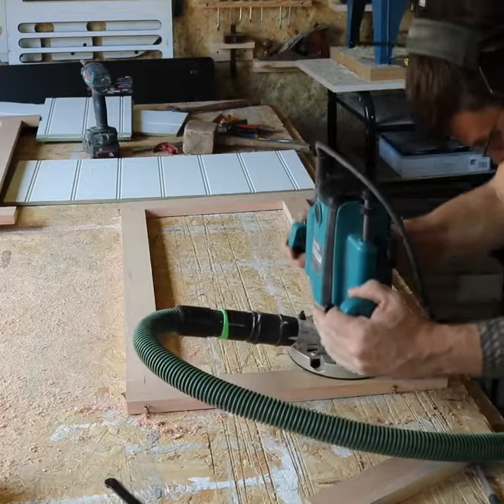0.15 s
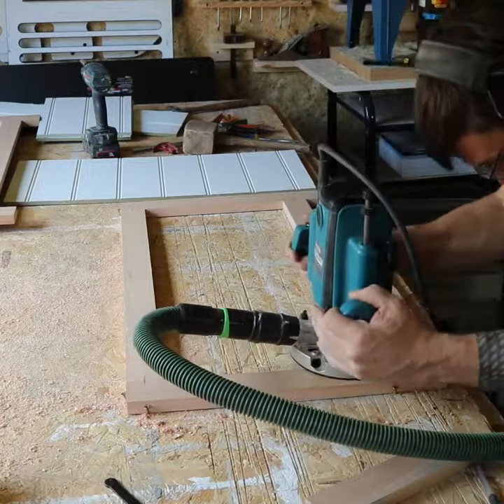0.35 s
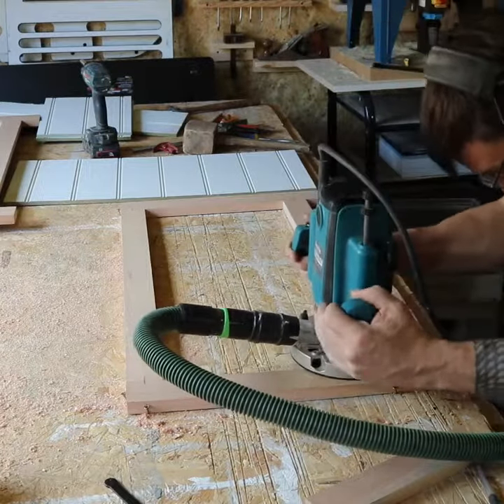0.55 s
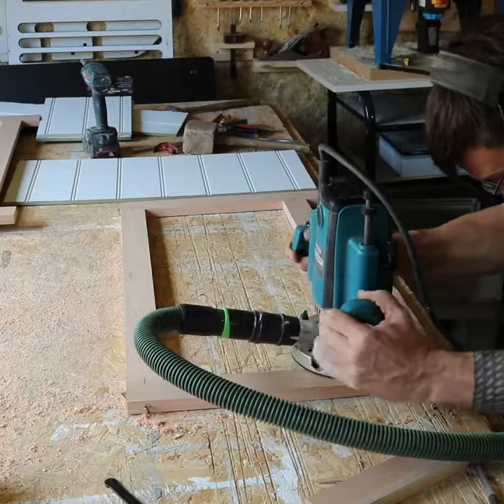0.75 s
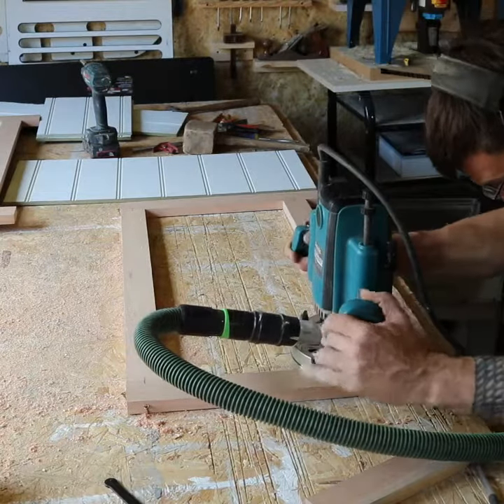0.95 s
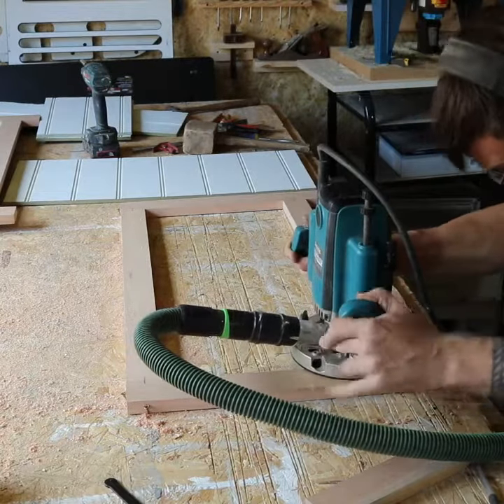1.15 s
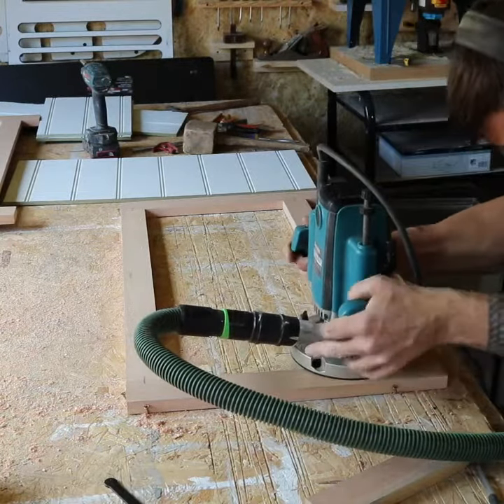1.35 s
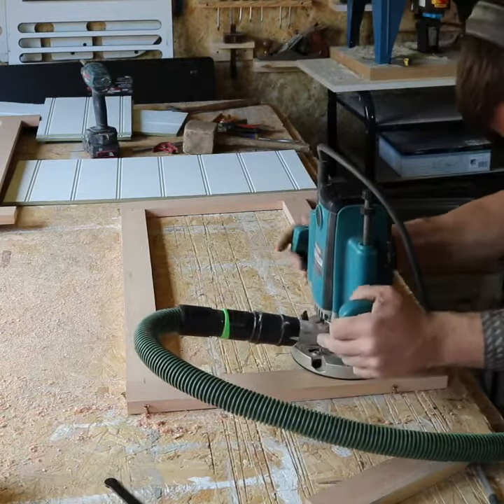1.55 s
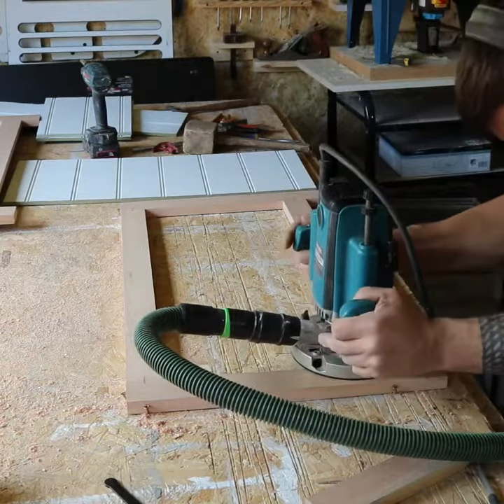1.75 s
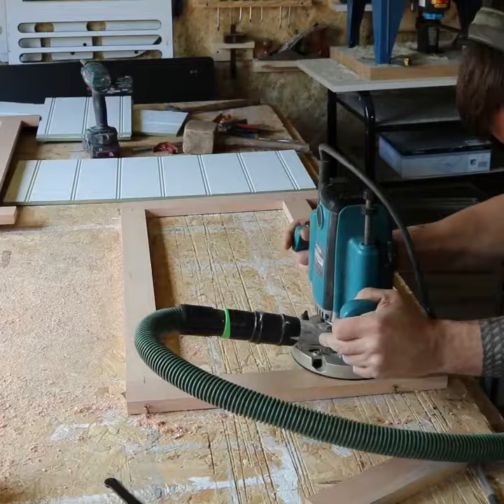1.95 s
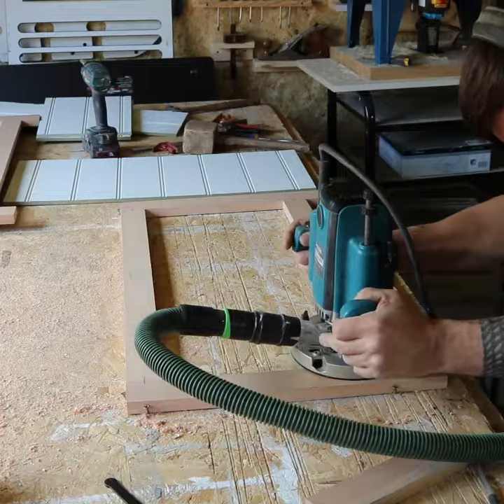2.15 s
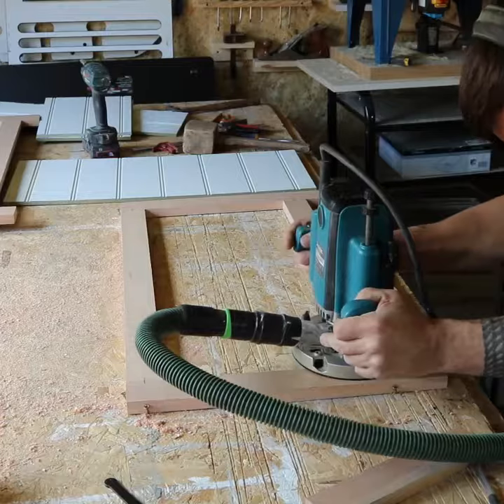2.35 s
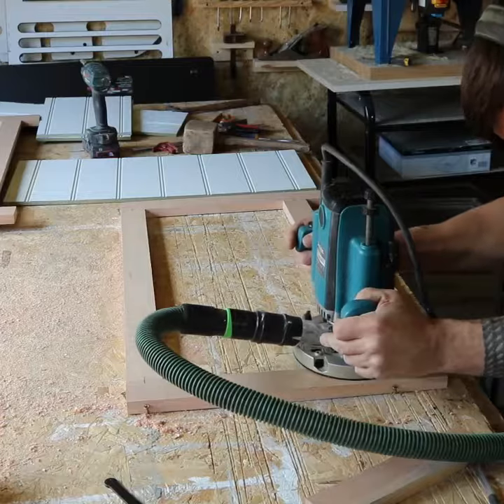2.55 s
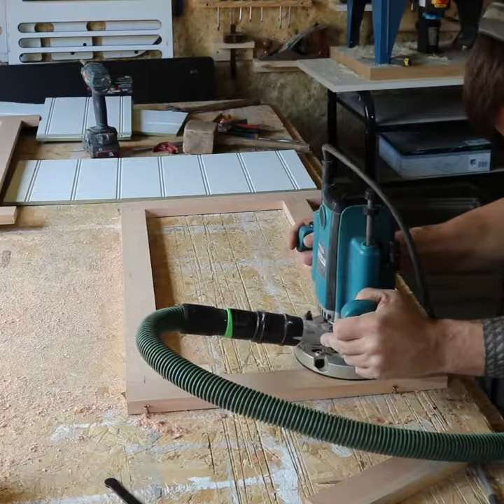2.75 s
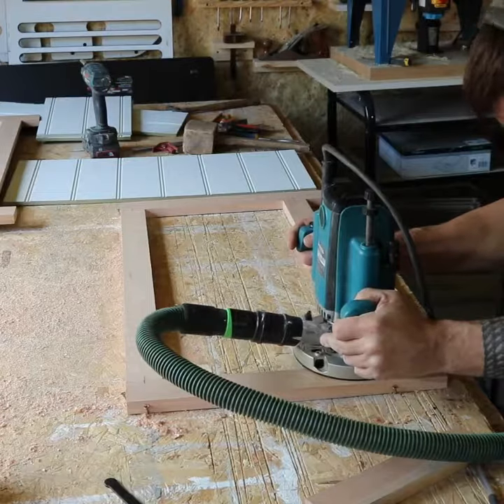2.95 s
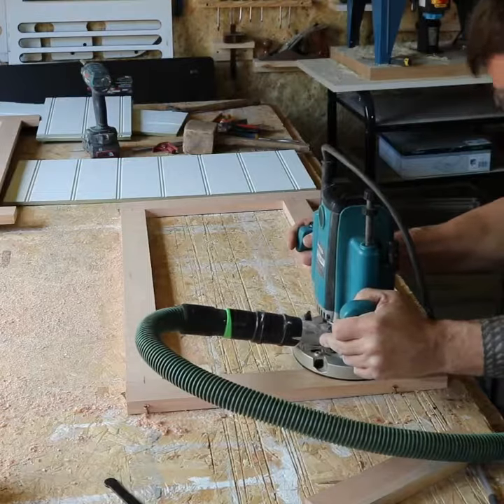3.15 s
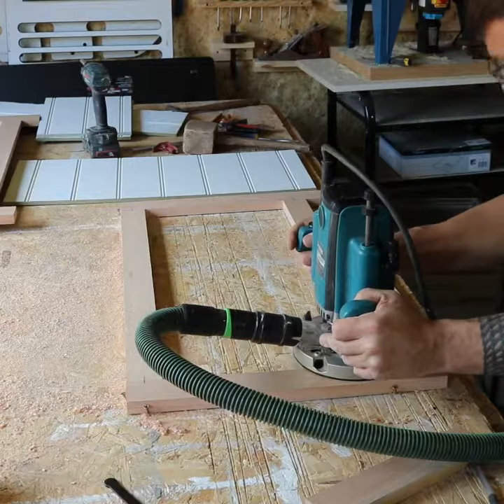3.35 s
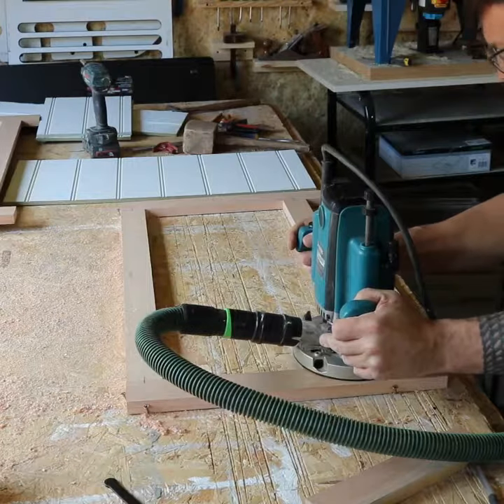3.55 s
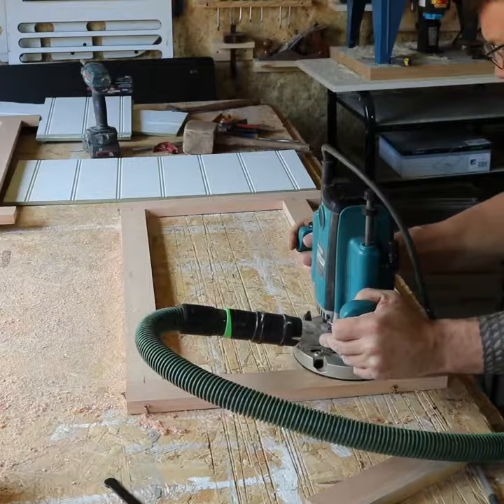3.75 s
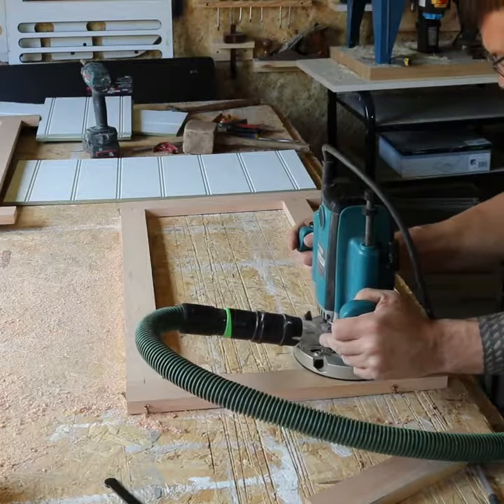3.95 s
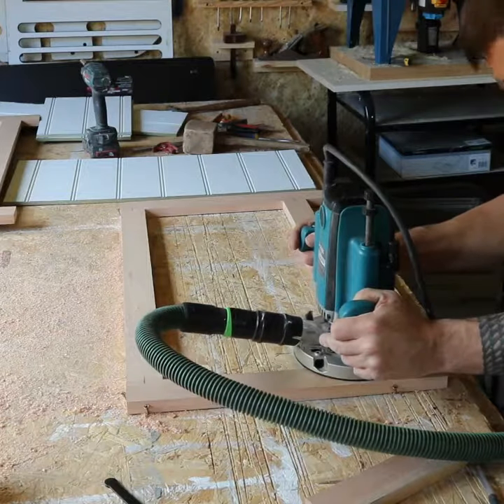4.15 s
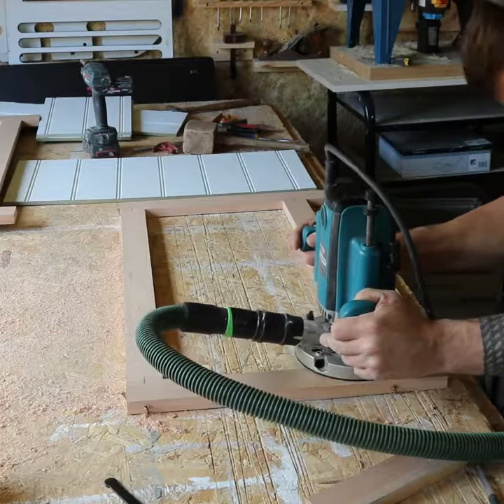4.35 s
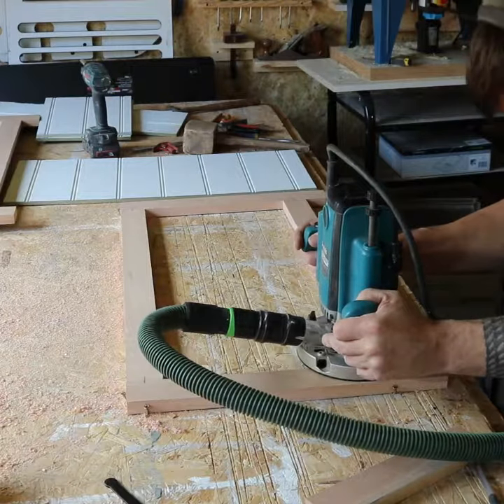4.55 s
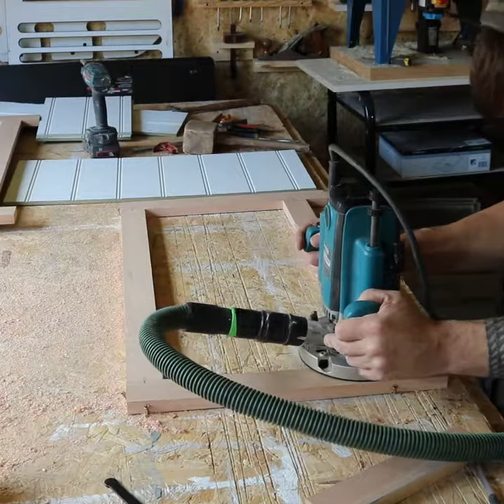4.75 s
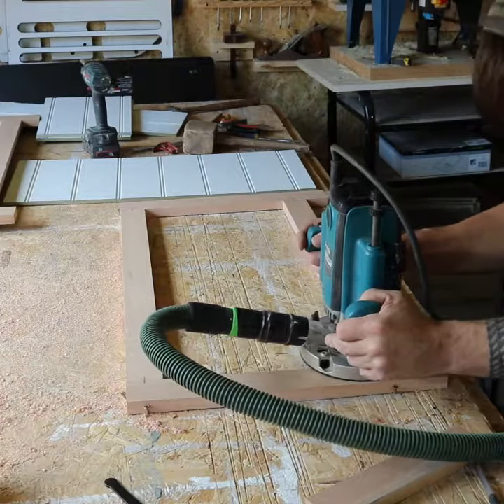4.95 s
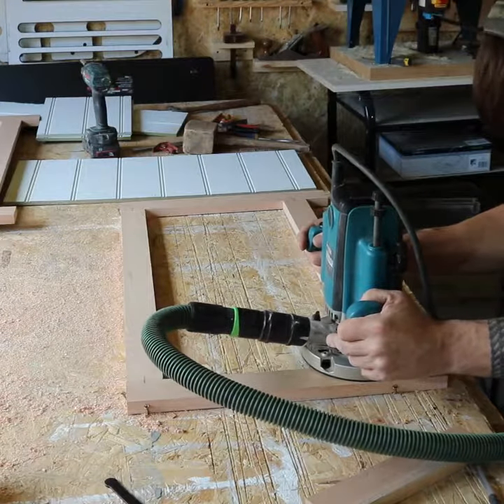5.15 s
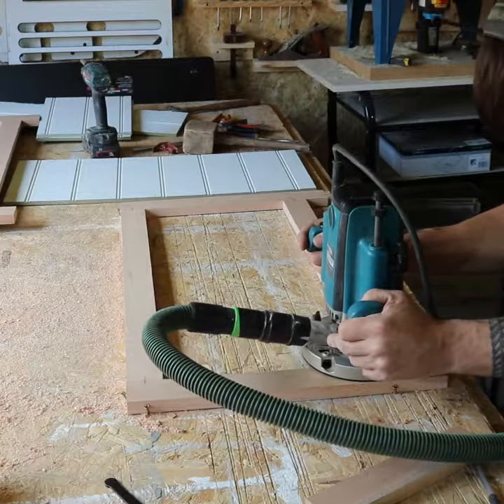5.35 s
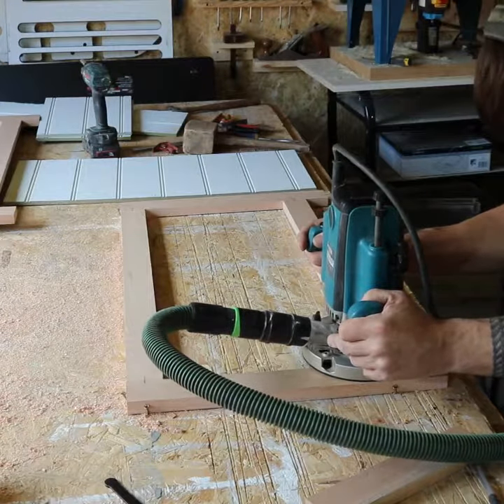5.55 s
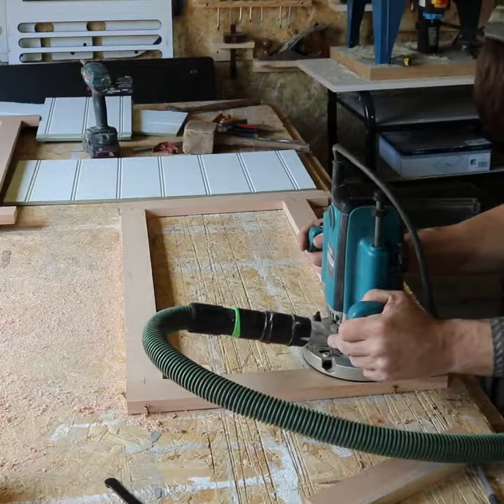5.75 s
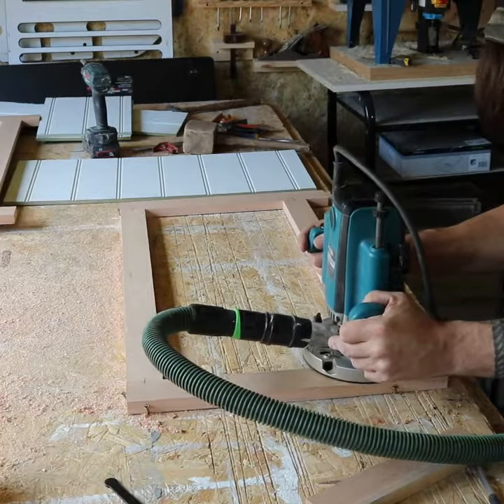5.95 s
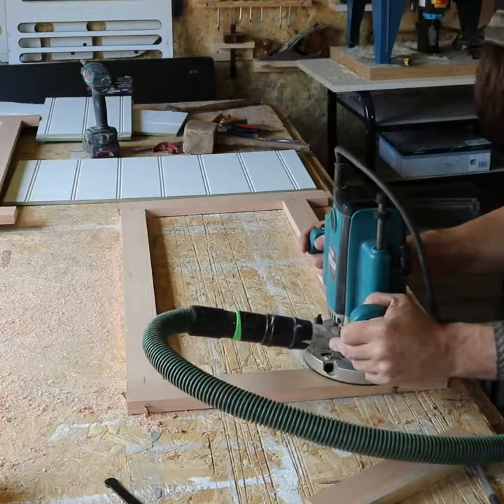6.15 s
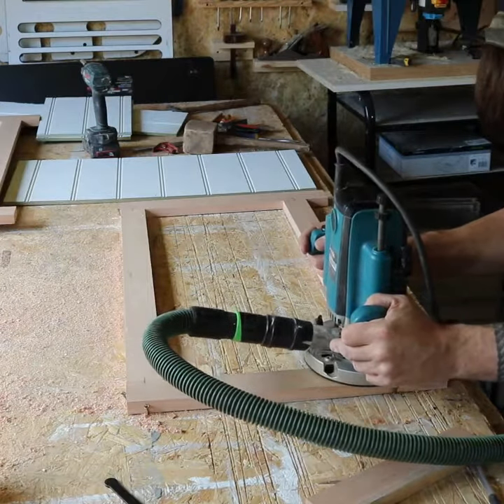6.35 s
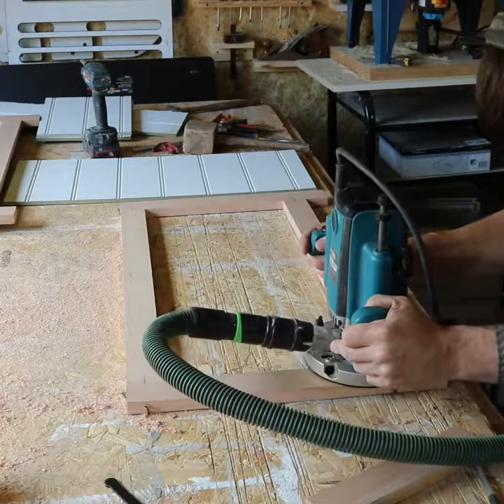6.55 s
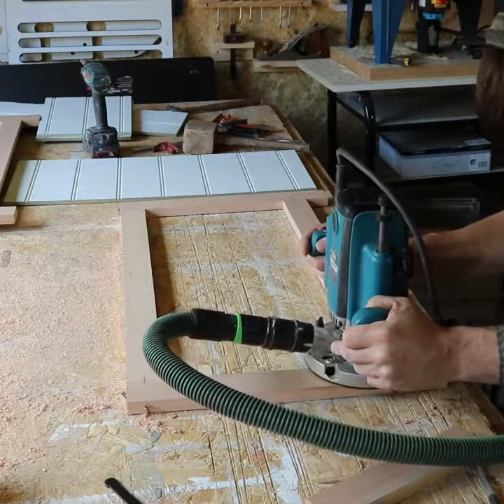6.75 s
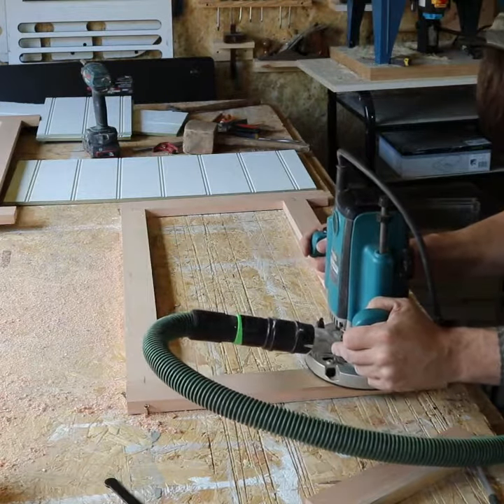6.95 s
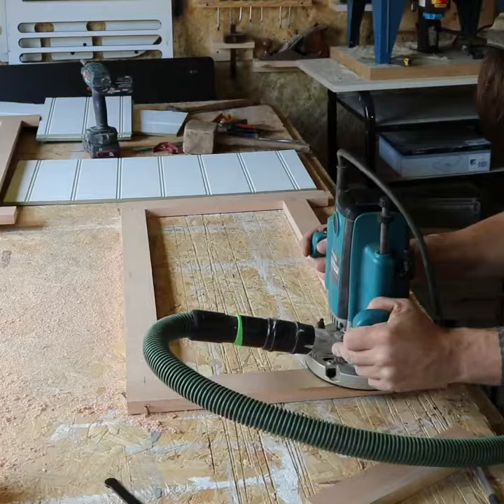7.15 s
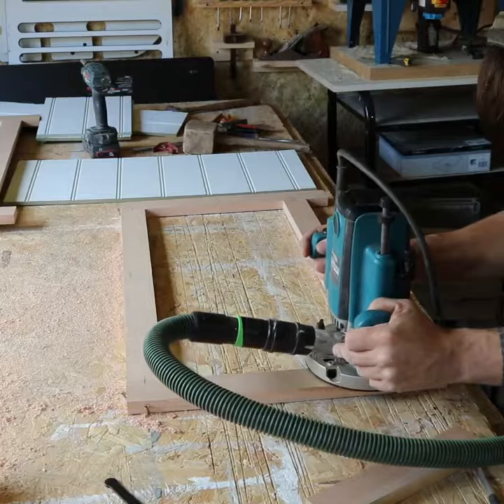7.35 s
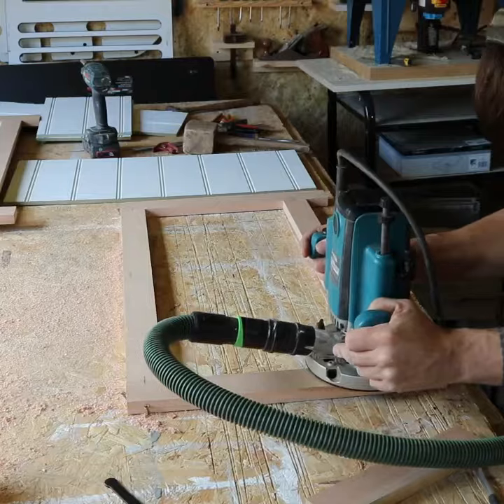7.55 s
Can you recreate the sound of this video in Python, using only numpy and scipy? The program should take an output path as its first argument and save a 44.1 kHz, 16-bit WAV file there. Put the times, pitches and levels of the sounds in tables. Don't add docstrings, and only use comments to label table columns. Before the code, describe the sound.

Rubs and knocks on a wooden bench, a sharp switch snap, then a router buzzes, spins up to a high whine and bites into wood.

```python
import sys
import numpy as np
from scipy import signal
from scipy.fft import rfft, irfft
from scipy.io import wavfile
from scipy.ndimage import uniform_filter1d

SR = 44100
rng = np.random.default_rng(int(sys.argv[2]) if len(sys.argv) > 2 else 0)


def elevation(decibels):
    levels = np.asarray(decibels, float)
    return 10 ** (levels / 20)


def waveform_to_disk(signal):
    frames = np.transpose(np.atleast_2d(signal))
    scaled = np.clip(frames, -1, 1) * 32767
    samples = np.round(scaled).astype(np.int16)
    wavfile.write(sys.argv[1], SR, samples)


N = 338688


def evened(x):
    return x / np.sqrt(np.mean(x ** 2) + 1e-20)


def read(points, hz):
    f, value = np.transpose(points)
    return np.interp(np.log(hz + 1), np.log(f + 1), value, left=-90, right=-90)


def curves(rows):
    s, *columns = np.transpose(rows)
    return [np.interp(np.arange(N) / SR, s, c) for c in columns]


def drift(rate_hz):
    t = np.arange(0, N + 256, 256) / SR
    rates = rate_hz * np.geomspace(.08, 1, 16)
    slow = sum(np.sin(2 * np.pi * (f * t + rng.random())) / np.sqrt(f) for f in rates)
    return np.interp(np.arange(N) / SR, t, evened(slow))


def bumps(rows):
    t = np.arange(0, N + 64, 64) / SR
    arches = sum(height * np.cos(np.pi / 2 * np.clip((t - s) / half, -1, 1)) ** 2 for s, half, height in rows)
    return np.interp(np.arange(N) / SR, t, arches + 0 * t)


def noise(spectrum, patchy_db, peaks=()):
    hz = np.fft.rfftfreq(1024, 1 / SR)
    a, b, patches = rng.standard_normal((N // 256 + 5, 513, 3)).T
    patches = evened(uniform_filter1d(uniform_filter1d(patches, 8, 0), 10, 1))
    db = read(spectrum, hz) + sum(d / (1 + (2 * (hz - f) / w) ** 2) for f, w, d in peaks)
    z = (a + 1j * b) * elevation(db[:, None] + patchy_db * patches)
    return evened(signal.istft(z, nperseg=1024, noverlap=768)[1][:N])


def resonate(x, hz, width):
    turn = np.exp(2j * np.pi * np.cumsum(hz * np.ones(len(x))) / SR)
    r = np.exp(-np.pi * width / SR)
    return 2 * (turn * signal.lfilter([(1 - r) ** 2], [1, -2 * r, r * r], x / turn)).real


def rings(modes, t, shorter):
    return sum(elevation(db - 60 * t / (shorter * min(t60, .3))) * np.sin(2 * np.pi * hz * t) for hz, db, t60 in modes)


def add(mix, s, sound):
    part = mix[round(s * SR):][:len(sound)]
    part += sound[:len(part)]


def shop(x):
    taps, t = np.zeros(SR // 2), np.arange(SR // 2) / SR
    at = np.arange(300, SR // 2 - 20, 20)
    taps[at + rng.integers(0, 20, len(at))] = rng.choice([-1., 1.], len(at))
    tail = signal.lfilter([.6], [1, -.4], taps * elevation(-60 * t / 0.25))
    return signal.fftconvolve(x, tail / np.linalg.norm(tail))[:N]


# f/Hz, level per Hz/dB
SHOP_AIR = [(60, -24), (100, -6), (150, 0), (220, -1), (400, -5), (800, -40)]


def hush():
    microphone = elevation(-61.5) * noise([(3000, -1), (9000, -2), (16200, -9)], .8)
    return microphone + elevation(-59.5) * noise(SHOP_AIR, 2.9)


EXTRACTOR_S, EXTRACTOR_DB = 3.05, -43
EXTRACTOR_HZ, SLACK_HZ, RUN_UP_S = 610, 200, 0.45


def extractor():
    t = np.maximum(np.arange(N) / SR - EXTRACTOR_S, 0)
    hz = EXTRACTOR_HZ - SLACK_HZ * np.exp(-t / RUN_UP_S) + 2 * drift(5)
    level = elevation(EXTRACTOR_DB - 1.5 * t + 3.5 * drift(6)) * np.minimum(t / .1, 1)
    return level * np.sqrt(2) * np.cos(2 * np.pi * np.cumsum(hz) / SR)


# f/Hz, t/s, half length/s, level/dB
HELD = [(300, 2.24, 0.13, -45), (514, 2.25, 0.19, -37), (600, 1.88, 0.15, -39), (1170, 1.96, 0.16, -36),
        (1180, 2.6, 0.05, -29), (650, 2.2, 0.06, -32), (100, 2.3, 0.45, -53), (100.1, 2.9, 0.8, -55.5),
        (1090, 2.4, 0.09, -30), (1180, 2.4, 0.05, -32), (780, 2.5, 0.06, -32), (830, 1.9, 0.05, -34),
        (900, 1.93, 0.06, -35)]


def held():
    t, out = np.arange(N) / SR, 0
    for hz, s, half, db in HELD:
        tone = np.sqrt(2) * np.cos(2 * np.pi * (hz * t + rng.random()))
        out += elevation(db) * bumps([(s, half, 1)]) * tone
    return out


# f/Hz, level per Hz/dB
SCRAPE = [(76, -37), (130, -9), (290, 1), (426, -8), (533, -0.5), (587, -3.5), (1690, -7), (1980, -8.5),
          (3370, -13.5), (6000, -33), (7800, -51), (13200, -120)]
# f/Hz, level per Hz/dB
RUSTLE = [(900, -26), (1700, 0), (2700, 1), (4000, 0), (6000, -3), (10200, -8.5), (14300, -19),
          (15600, -32)]
# t/s, half length/s, scrape/dB, rustle/dB, bench rumble/dB
STROKES = [(0.0, 0.033, -39, -37.5, -49), (0.06, 0.03, -48, -45, -52), (0.104, 0.13, -36, -43, -43),
           (0.235, 0.091, -41.5, -46.5, -48), (0.312, 0.087, -58, -46, -42.5), (0.43, 0.12, -44, -56, -64),
           (0.56, 0.07, -50, -62, -64), (0.675, 0.15, -56, -53.5, -62), (1.08, 0.1, -60, -68, -62),
           (1.31, 0.05, -60, -57, -64), (0.974, 0.12, -61, -67, -59), (1.288, 0.16, -60, -56, -63),
           (1.47, 0.084, -43, -53, -66), (1.55, 0.052, -38.5, -36.5, -61), (1.646, 0.058, -30, -25.5, -62),
           (1.77, 0.12, -42, -51, -55)]
# scrape/dB, rustle/dB, rumble/dB
REST = [-57, -62, -65]
STROKE_FALL_DB, STROKE_ROUND = 12.5, 1.47


def hands():
    end = round(2.2 * SR)
    t = np.arange(end) / SR
    strokes = [elevation(-STROKE_FALL_DB * abs((t - s) / half) ** STROKE_ROUND) for s, half, *_ in STROKES]
    strokes = np.pad(strokes, [(0, 0), (0, N - end)])
    peaks = elevation(np.array(STROKES)[:, 2:].T)
    power = elevation(np.array(REST))[:, None] ** 2 + peaks ** 2 @ np.square(strokes)
    scrape, rustle, weight = np.sqrt(power)
    grain = elevation(1.2 * drift(70))
    rumble = sum(share * evened(resonate(rng.standard_normal(N), hz, width))
                 for share, hz, width in [(1, 83, 42), (0.21, 45, 30), (0.43, 150, 50)])
    rub = scrape * noise(SCRAPE, 1.6) + rustle * noise(RUSTLE, 1.5)
    return (rub * grain + weight * rumble) * np.clip((2.1 - np.arange(N) / SR) / 0.18, 0, 1)


# t/s, level/dB, f/Hz, t60/s
PINGS = [
    (0.265, -23, 3300, 0.03),
    (0.269, -22, 3700, 0.03),
    (0.277, -23, 2600, 0.05),
    (0.287, -27, 2800, 0.04),
    (0.42, -38, 3500, 0.04),
    (0.493, -39, 770, 0.12),
    (0.709, -39, 300, 0.098),
    (0.786, -40, 500, 0.08),
    (0.786, -49, 6900, 0.05),
    (1.716, -30, 2780, 0.3),
]
# t/s, half length/s, f/Hz, level/dB
SQUEAKS = [
    (0.1, 0.073, 3400, -42),
    (0.12, 0.13, 1830, -47),
    (0.12, 0.12, 4800, -49),
    (0.675, 0.04, 5300, -58),
    (1.561, 0.035, 2500, -41),
    (1.635, 0.04, 2300, -33),
]


def small_parts():
    out, t = np.zeros(N), np.arange(SR // 4) / SR
    for s, db, hz, t60 in PINGS:
        add(out, s, elevation(db - 60 * t / t60) * (1 - np.exp(-t / .001)) * np.sin(2 * np.pi * hz * t))
    for s, half, hz, db in SQUEAKS:
        arch = np.hanning(round(2 * half * SR))
        squeak = evened(resonate(rng.standard_normal(SR // 2), hz, 600))[:len(arch)]
        add(out, max(s - half, 0), elevation(db) * arch * squeak)
    return out


# t/s, level/dB
TICKS = [
    (0.2648, -13),
    (0.2745, -19),
    (0.491, -33),
    (0.786, -44),
    (1.4195, -36),
    (1.7142, -21),
]


def ticks():
    out, u = np.zeros(N), np.arange(40) / SR / .00005
    for s, db in TICKS:
        add(out, s, elevation(db) * (1 - u) * np.exp(-u))
    return np.convolve(out, [.3, .55, .3], "same")


# t/s, peak level/dB, brightness/dB per octave, contact length/s, t60/s
KNOCKS = [
    (0.264, -13, 0.5, 0.0035, 0.18),
    (0.421, -29.5, -5, 0.003, 0.12),
    (0.427, -31, -13, 0.003, 0.15),
    (0.491, -28.5, -23, 0.0015, 0.17),
    (0.706, -30.5, -14, 0.009, 0.24),
    (0.785, -38.5, -4, 0.003, 0.2),
    (1.184, -43, -2, 0.002, 0.07),
    (1.419, -22.5, -15, 0.0025, 0.22),
]
# f/Hz, level/dB, t60/s
WOOD = [(283, -17, 0.2), (624, -11, 0.65), (2440, 12, 0.16), (2740, -4, 0.11), (3070, 0, 0.19),
        (3780, 13, 0.11), (4400, -11, 0.26), (6352, -13, 0.15), (7698, -14, 0.13), (8699, -12, 0.1)]
# f/Hz, level per Hz/dB
BLOW = [(24, -35), (40, -9), (179, -3.5), (310, 1.5), (976, 1), (1610, -2), (2580, 0), (4700, -3),
        (5890, -10.5), (10500, -14.5), (15600, -45)]
KNEE_HZ = 2300


def knocks():
    out, t, hz = np.zeros(N), np.arange(SR // 2) / SR, np.fft.rfftfreq(SR // 2, 1 / SR)
    for s, db, tilt_db, contact, t60 in KNOCKS:
        colour = elevation(read(BLOW, hz) + tilt_db * np.log2(np.maximum(hz, KNEE_HZ) / KNEE_HZ))
        crack = evened(irfft(rfft(rng.standard_normal(len(t))) * colour, len(t)))
        body = crack * (1 - np.exp(-t / max(contact, 1e-4))) * elevation(-60 * t / t60)
        snap = crack * (1 - np.exp(-t / .0008)) * elevation(-60 * t / 0.016)
        add(out, s, elevation(db - 6.5) * (body + 0.62 * snap + 0.073 * rings(WOOD, t, 0.22)))
    return out


# t/s, level/dB, f/Hz
SWITCH = [
    (1.714, -13, 2780),
    (1.727, -27, 2730),
    (1.777, -19, 2100),
    (1.7805, -28, 2280),
]


def switch():
    out, t = np.zeros(N), np.arange(SR // 4) / SR
    for s, db, hz in SWITCH:
        tick, tail = rng.standard_normal((2, len(t)))
        ring = np.sin(2 * np.pi * hz * t) * (1 - np.exp(-t / 0.00066)) * elevation(-60 * t / 0.012)
        rough = evened(resonate(tail, hz, 2300)) * elevation(-15 - 60 * t / 0.12)
        add(out, s, elevation(db) * (ring + rough + 0.14 * tick * elevation(-60 * t / 0.0088)))
    return out


# t/s, speed/turns per s
SPEED = [(1.78, 15), (2.0, 95), (2.19, 160), (2.33, 252), (2.5, 306), (2.7, 344), (3.0, 370.7),
         (3.5, 390.5), (3.9, 398.7), (4.3, 403.7), (4.85, 407.4), (5.05, 404.3), (5.33, 397.4),
         (5.75, 398.6), (6.3, 396.6), (7.0, 395.8), (7.38, 390), (7.68, 389.2)]
INERTIA_S = .09


def shaft_speed():
    return uniform_filter1d(curves(SPEED)[0], size=round(INERTIA_S * SR))


# t/s, buzz level/dB
CURRENT = [(1.775, -60), (1.782, -28), (1.88, -25), (2.06, -29), (2.1, -43), (2.3, -34), (2.43, -42.5),
           (3.3, -45), (4.0, -52.5), (7.68, -47)]
# f/Hz, level/dB
BUZZ = [(100, -6), (200, -29), (300, 3.5), (400, 6), (500, -9), (600, -3), (900, -3), (1100, -15),
        (1200, 2.5), (1600, -15), (2150, 6), (2600, -5.5), (4000, -7)]
# f/Hz, level/dB
WHINE = [(500, -47), (800, -32), (1350, -33), (1600, -23), (1850, -16), (2150, -16.5), (2450, -22),
         (3300, -22.5), (3800, -24.5), (4300, -30), (4700, -45)]
MAINS_HZ, SLOTS = 100, 16
OVERTONE_DB = -10.5


def windings(turns, mains):
    (buzz_db,), slot_hz = curves(CURRENT), SLOTS * shaft_speed()
    buzz = 0
    for k in range(1, 40):
        level = elevation(read(BUZZ, k * MAINS_HZ) + min(0.28 * k, 3.5) * drift(25.17))
        buzz += level * np.cos(k * mains + 4.4 * rng.random())
    throb = (1 + .9 * np.cos(mains) + .4 * np.cos(2 * mains)) * elevation(1.5 * drift(80))
    shudder = resonate(rng.standard_normal(N), 159, 73)
    growl = resonate(rng.standard_normal(N) * throb ** 2, 2120, 500)
    on = mains > 2 * np.pi * MAINS_HZ * SPEED[0][0]
    hum = on * elevation(buzz_db) * (evened(buzz) + elevation(-18.5) * evened(shudder) + elevation(-7) * evened(growl))

    slot = 2 * np.pi * (SLOTS * turns + 0.12 * drift(260))
    fuzz = evened(resonate(rng.standard_normal(N), slot_hz, 450))
    whine = throb * np.cos(slot) + .42 * fuzz
    whine += .35 * shop(whine)
    twice_db = OVERTONE_DB + read(WHINE, 2 * slot_hz) + 6 * np.log2(slot_hz / 1120)
    overtone = elevation(twice_db) * throb * np.cos(2 * slot)
    return hum + elevation(read(WHINE, slot_hz - 1)) * evened(whine) + overtone


# t/s, roar level/dB
AIR = [(1.78, -45), (1.82, -33), (1.9, -23.5), (2.02, -18.5), (2.12, -25.5), (2.33, -18), (3.24, -18.5),
       (4.3, -20.5), (4.6, -19.5), (4.8, -19.5), (4.98, -21), (5.3, -21.5), (5.72, -20), (7.3, -21),
       (7.68, -20)]
# f/Hz, level per Hz/dB
ROAR = [(530, -46), (900, -10.5), (1170, -4), (1270, -5), (1500, -4.5), (2040, -4), (2200, -3.5), (2360, 1),
        (2570, -1.5), (4080, 0.5), (9000, -11.5), (11700, -33), (19800, -120)]
# f/Hz, level per Hz/dB
RATTLE = [(24, -78), (40, -55), (86, -47), (177, -29), (336, -11.5), (396, -16.5), (451, -14), (626, -7),
          (800, -3), (912, -9), (1170, -9.5), (1490, -8), (2000, -3), (2600, -44), (4400, -120)]
# f/Hz, level per Hz/dB
HISS = [(3240, -24), (5500, -4), (6580, -3.5), (7560, -7), (9730, -3), (11200, -8.5), (13000, -10.5),
        (14500, -14), (15700, -19), (16200, -30)]
# f/Hz, width/Hz, lift/dB
HOUSING = [(276, 18.4, 14), (507, 63, 10), (629, 28, 11), (1087, 56, 5), (2100, 72, 5.5), (3380, 120, 4.5),
           (3530, 170, -2.5)]
# t/s, half length/s, lift/dB
JOLTS = [
    (1.836, 0.11, 12.5),
    (2.294, 0.48, 4.5),
]
FULL_DB = -20
HISS_DB, HISS_STEEP = -29, 0.99
RATTLE_DB, RATTLE_STEEP = -30, 1


def motor_air(turns, mains):
    roar_db, = curves(AIR)
    rattle_db = RATTLE_DB + RATTLE_STEEP * (roar_db - FULL_DB) + bumps(JOLTS)
    hiss_db = HISS_DB + HISS_STEEP * (roar_db - FULL_DB)
    chop = 1 + 0.047 * np.cos(2 * np.pi * turns) + 0.03 * np.cos(4 * np.pi * turns) + 0.015 * np.cos(mains)
    chop *= elevation(.25 * drift(12))
    roar = elevation(roar_db) * noise(ROAR, 1.17, HOUSING)
    rattle = elevation(rattle_db) * noise(RATTLE, 0.69, HOUSING)
    hiss = elevation(hiss_db) * noise(HISS, 1.8)
    return (roar + rattle + hiss) * chop * np.clip((np.arange(N) / SR - 1.775) / 0.011, 0, 1)


# multiple, level off resonance/dB, share of the bite
ORDER = [(1, -50, 0.0), (2, -49.5, 0.75), (3, -48.5, 0.003), (4, -48, 0.3), (5, -47, 0.097), (6, -54, 0.84),
         (8, -54, 0.94), (10, -53.5, 0.9)]
# f/Hz, width/Hz, lift/dB
STANDING = [(292, 34, 18), (352.7, 15, 20), (393, 24, 17), (794, 18, 2.5), (1076, 36, 8), (1130, 50, 11),
            (1185.9, 20, 22), (1566, 53, 1), (1613.4, 26, 13.5), (1929, 27, 15.5), (2022, 62, 8),
            (2375, 61, 7.5), (3173, 36, 5.5), (3970, 37, 7)]
# multiple, t/s, half length/s, change/dB
SWELLS = [(1, 3.12, 0.35, -10), (1, 7.38, 0.51, -5.5), (2, 5.2, 0.29, 7.5), (2, 5.59, 0.41, -13),
          (2, 7.05, 0.18, 5), (3, 4.9, 0.14, -3), (3, 6.86, 0.35, -2), (3, 7.6, 0.33, -22),
          (4, 3.55, 0.1, 9), (3, 3.79, 0.17, -10.5), (2, 3.65, 0.25, -10), (4, 5.45, 0.17, -7),
          (4, 6.18, 0.48, -8), (4, 5.05, 0.25, 2.5), (6, 6.9, 0.27, -6), (6, 7.25, 0.22, 0.5),
          (8, 4.95, 0.2, 7.5), (8, 5.35, 0.11, -3), (8, 5.55, 0.13, 8), (8, 6.15, 0.22, 7.5),
          (8, 6.5, 0.2, -5), (10, 5.67, 0.3, -3), (10, 5.93, 0.15, 7), (10, 7.0, 0.093, 7.5),
          (10, 7.3, 0.22, -16), (1, 2.38, 0.25, -6), (3, 3.77, 0.17, 7.5), (3, 7.03, 0.18, -6),
          (3, 2.82, 0.15, -6), (4, 2.42, 0.2, -15), (5, 2.4, 0.2, -10), (1, 2.45, 0.06, 4),
          (1, 2.6, 0.05, 6), (3, 3.42, 0.07, -6), (2, 6, 0.1, -7), (4, 4.5, 0.09, -4), (4, 7.0, 0.15, 4),
          (8, 5.15, 0.13, 3), (8, 5.6, 0.35, -1), (10, 5.8, 0.17, -6), (6, 5.4, 0.28, 2.5),
          (2, 4.88, 0.092, -4), (5, 3.4, 0.15, -7), (10, 4.99, 0.042, 6), (9, 7.55, 0.16, 5.5),
          (2, 6.05, 0.2, 3.5), (9, 6.1, 0.33, 1), (9, 5.3, 0.44, -12), (37, 7.6, 0.5, -15),
          (38, 7.6, 0.37, -10), (16, 4.56, 2, 18), (1, 5.5, 0.55, -1.5), (37, 4.6, 1.4, -1),
          (10, 4.95, 0.15, 6)]
# t/s, level/dB
BITE = [
    (0, -63),
    (4.75, -50.5),
    (4.87, -41.5),
    (5.2, -46),
    (5.32, -49.5),
    (6.85, -52.5),
    (6.95, -50),
    (7.35, -38.5),
    (7.47, -58),
]
# from/s, to/s
STAGES = [
    (4.84, 5.22),
    (5.6, 6.9),
    (6.92, 7.32),
]
# multiple of the shaft, level in each of the three stages/dB
EDGES = [(7, -44, -43, -35), (11, -42, -44, -45), (12, -46, -46, -35), (13, -50, -46, -41),
         (14, -52, -42, -49), (15, -50, -43, -44), (16, -60, -40, -42), (17, -56, -46, -50),
         (18, -54, -45, -38), (20, -39, -46, -41), (22, -42, -44, -36.5), (23, -56, -50, -46),
         (24, -41, -47, -38.5), (25, -56, -52, -49), (26, -49, -51, -42), (27, -56, -51, -57),
         (28, -55, -49, -48), (29, -55, -53, -55), (30, -49, -52, -47.5), (31, -54, -57, -54),
         (32, -48, -50, -46.5), (33, -62, -55, -55), (34, -56, -55, -51), (35, -66, -58, -66),
         (36, -58, -54, -48)]
# multiple of the shaft, level/dB, start/s
FAN = [
    (9, -37.5, 4.4),
    (37, -52, 2.6),
    (38, -52, 6.15),
]
IDLE_DB, SLOT_DB = -62, -54
WOBBLE_DB, WOBBLE_FALL_DB = -46, 0.6


def shaft_tones(turns):
    t, tremble = np.arange(N) / SR, 0.0064 * drift(12)
    speed, (bite_db,) = shaft_speed(), curves(BITE)

    def tone(k):
        return np.sqrt(2) * np.cos(2 * np.pi * (k * (turns + tremble) + rng.random()))

    def swell(k):
        return bumps([row[1:] for row in SWELLS if row[0] == k])

    out = np.zeros(N)
    for k, db, share in ORDER:
        near = [row for row in STANDING if abs(np.log(row[0] / k / 350)) < .28]
        lift = 1 + sum(elevation(d) / (1 + (2 * (k * speed - f) / w) ** 2) for f, w, d in near)
        level_db = db + share * (bite_db - IDLE_DB) + swell(k) + 0.6 * drift(6)
        out += elevation(level_db) * lift * tone(k)
    out += elevation(SLOT_DB + swell(SLOTS) - 1.5 + 4.5 * drift(30)) * tone(SLOTS)

    stage = np.array([np.clip(np.minimum(t - a, b - t) / 0.065 + .5, 0, 1) for a, b in STAGES])
    for k, *db in EDGES:
        out += elevation(np.array(db)) @ stage * elevation(-.5 + 2.3 * drift(16)) * tone(k)

    wobble = sum(elevation(WOBBLE_DB - WOBBLE_FALL_DB * (k - 11) + 3 * drift(6)) * tone(k) for k in range(11, 24))
    out += wobble * (speed / 400) ** 4 * (1 - stage.sum(0))
    for k, db, s in FAN:
        out += elevation(db + swell(k) + 1.0 * drift(2.8)) * tone(k) * np.clip((t - s) / .1, 0, 1)
    return out * np.clip((t - 2.05) / 0.13, 0, 1)


def scene():
    turns = np.cumsum(shaft_speed()) / SR
    mains = 2 * np.pi * MAINS_HZ * np.arange(N) / SR
    near = ticks() + small_parts() + knocks() + switch() + windings(turns, mains)
    low_cut = signal.butter(4, 75, "high", fs=SR, output="sos")
    air = signal.sosfilt(low_cut, motor_air(turns, mains))
    mid = near + elevation(-15.0) * shop(near) + hush() + extractor() + held() + hands() + air + shaft_tones(turns)
    return np.array([mid, mid])


# f/Hz, level against their neighbours/dB
MASK = [(3000, -14), (5500, -9.5), (7500, -7), (9000, -6), (10500, -4.3), (11150, -4.5), (11300, -.5),
        (11450, -4), (13000, -2.6), (14300, -1.5), (15000, .5), (16500, 2.5)]
# t/s, rise/dB
SHORT = [(0, -1), (1.4, -1), (1.6, -2), (1.9, 1), (2.8, 2.5), (3.8, -.5), (5.5, -1), (5.8, 2), (7.68, 2)]
FILLS_PER_S, FILL_LOW_HZ, FILL_HIGH_HZ, FILL_WIDTH_HZ = 3.8, 4300, 11500, 1500


def thin_treble(x):
    hz, t, z = signal.stft(x, SR, nperseg=1024, noverlap=768)
    hz = hz[:, None]
    power = uniform_filter1d(uniform_filter1d(abs(z) ** 2, size=6, axis=1), size=3, axis=0)
    around = uniform_filter1d(uniform_filter1d(power, size=9, axis=1), size=31, axis=0)
    short_db = np.interp(t, *np.transpose(SHORT)) * np.clip(hz / 5000 - 2, 0, 1)
    kept = power > around * elevation(read(MASK, hz) + short_db) ** 2
    z *= uniform_filter1d(1. * kept, size=2, axis=1)

    spots = rng.random((round(FILLS_PER_S * N / SR), 2))
    spots = spots * [N / SR, FILL_HIGH_HZ - FILL_LOW_HZ] + [0, FILL_LOW_HZ]
    filled = sum((abs(t - s) < .013) & (hz > low) & (hz < low + FILL_WIDTH_HZ) for s, low in spots) > 0
    fresh = np.sqrt(around) * np.exp(2j * np.pi * rng.random(z.shape))
    return signal.istft([z, filled * fresh], SR, nperseg=1024, noverlap=768)[1][:, :N]


def band_limit(x):
    return signal.sosfilt(signal.butter(12, 15730, fs=SR, output="sos"), x)


def record(dry):
    mid, side = thin_treble(dry[0])
    return band_limit(np.array([mid + side, mid - side]))


dry = scene()
out = record(dry)
waveform_to_disk(out)
```